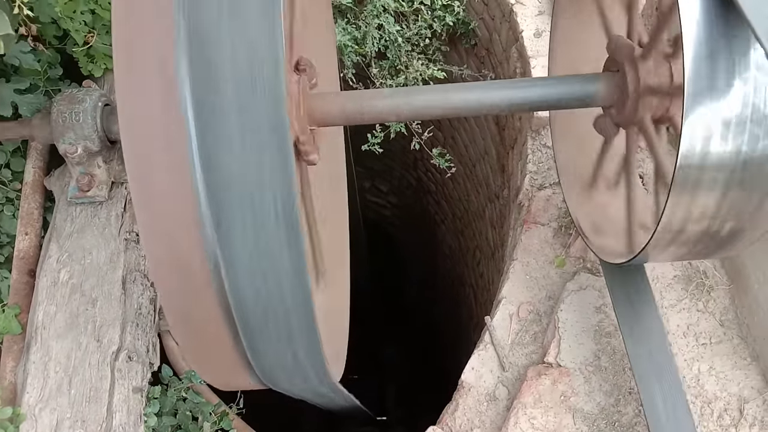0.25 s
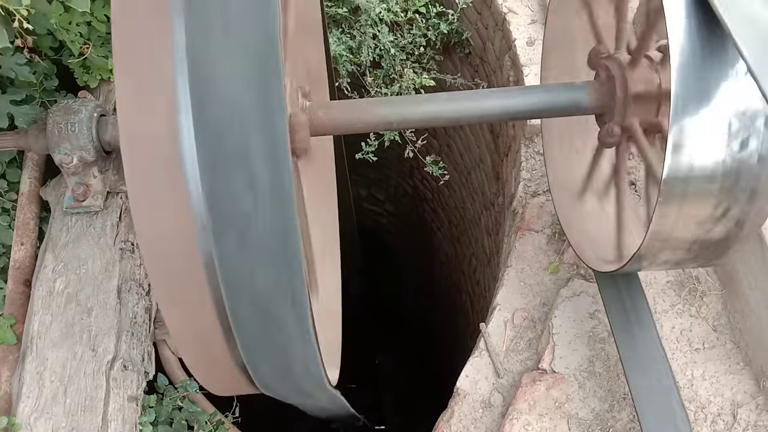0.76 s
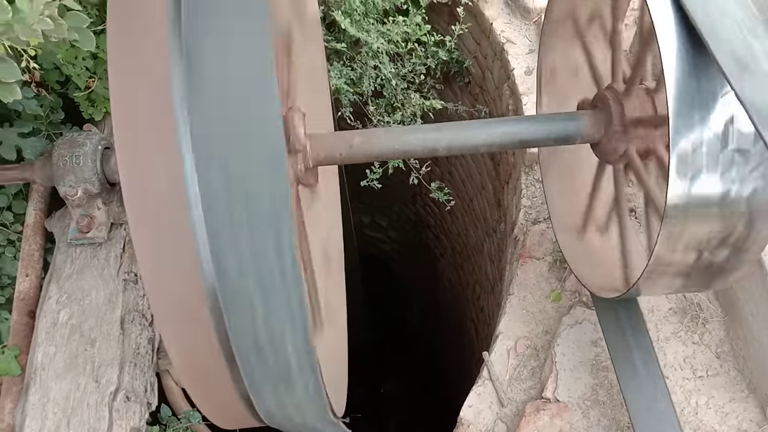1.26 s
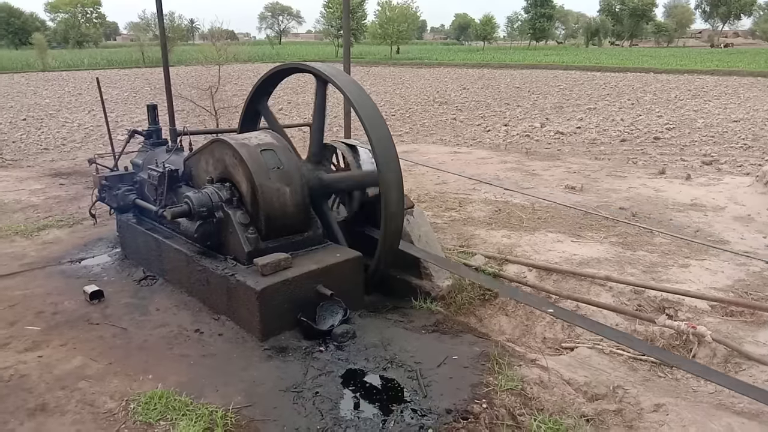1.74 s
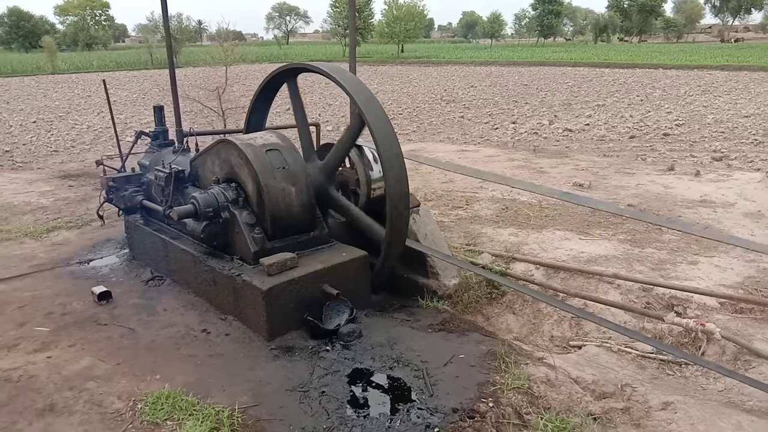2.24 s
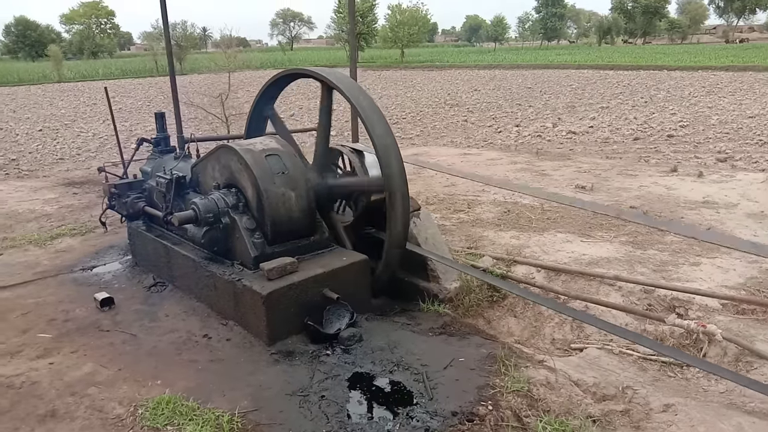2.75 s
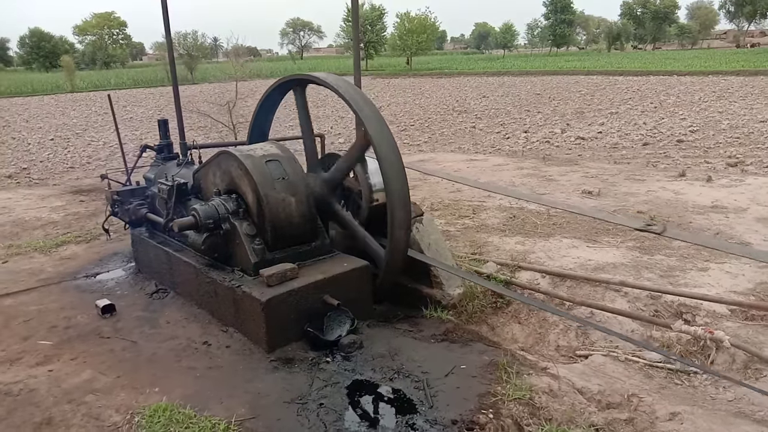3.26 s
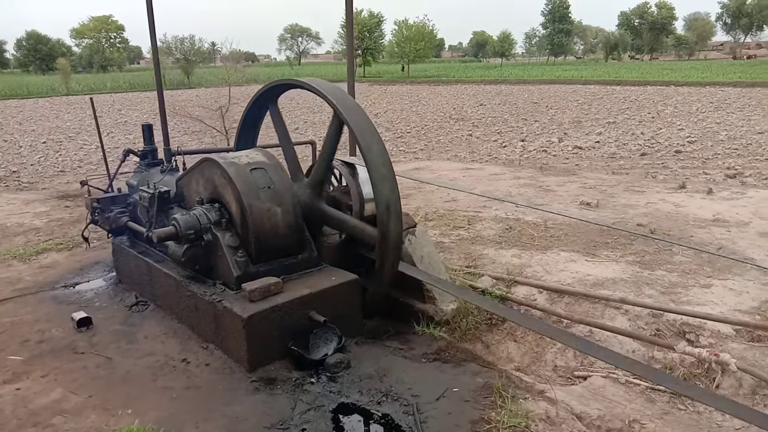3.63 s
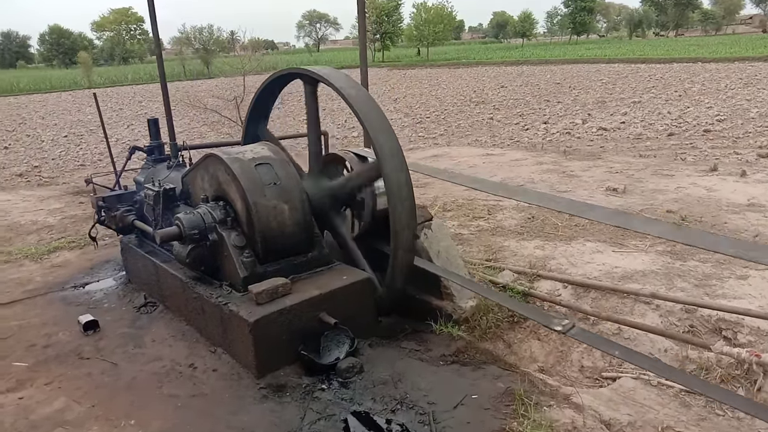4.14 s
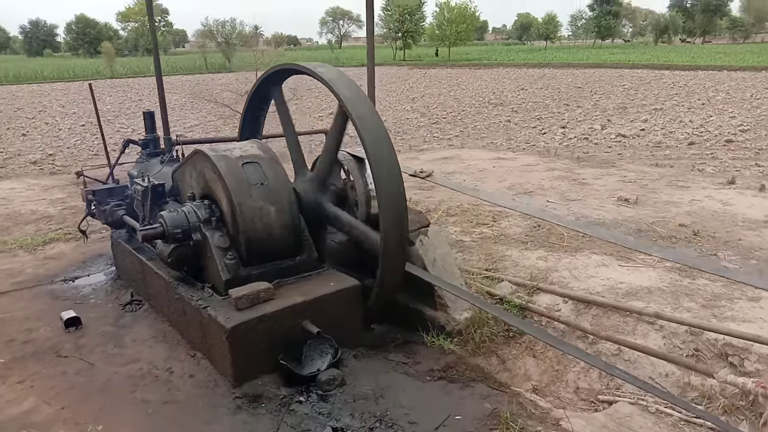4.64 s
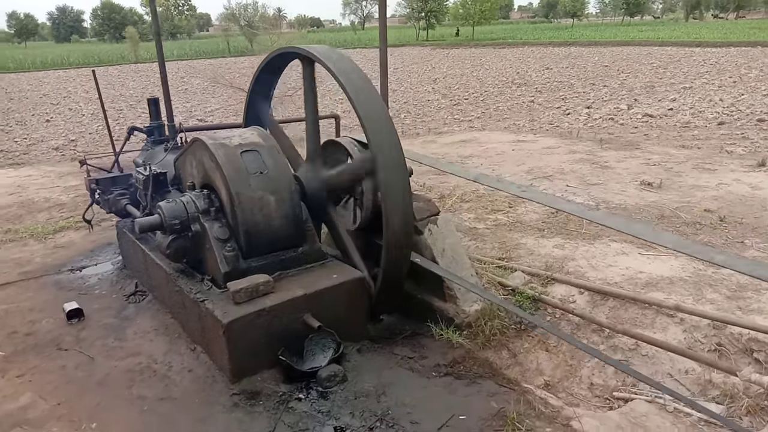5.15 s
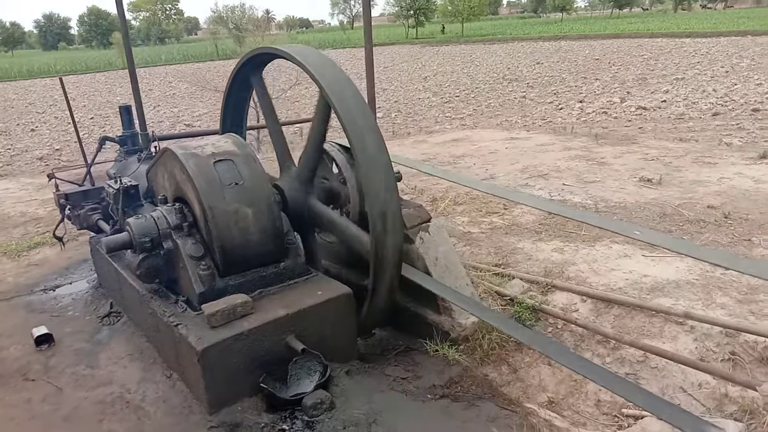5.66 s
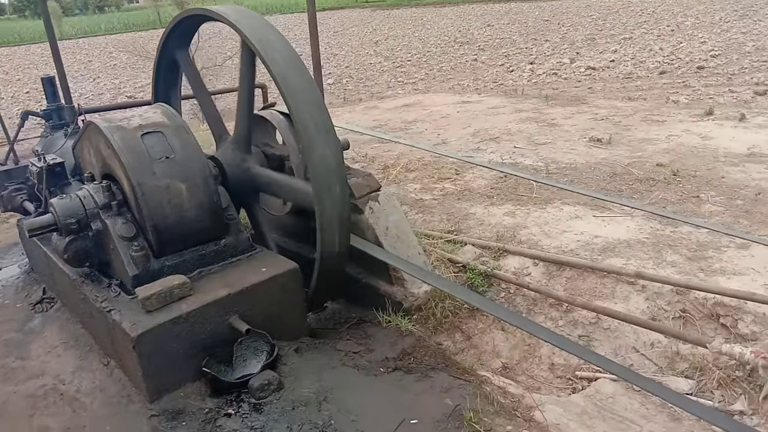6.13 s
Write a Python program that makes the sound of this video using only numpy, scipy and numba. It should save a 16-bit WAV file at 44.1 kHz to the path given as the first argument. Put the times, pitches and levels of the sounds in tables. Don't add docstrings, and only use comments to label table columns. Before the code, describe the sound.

Loose iron knocks and belt slaps at a well pump, a brief silence, then an old single-cylinder diesel clattering and chuffing steadily outdoors.

```python
import sys
import numpy as np
from scipy import signal
from scipy.fft import rfft, irfft
from scipy.io import wavfile
from numba import njit

SR = 44100
rng = np.random.default_rng(int(sys.argv[2]) if len(sys.argv) > 2 else 0)


def wav_record(signal):
    frames = np.transpose(np.atleast_2d(signal))
    bounded = np.clip(frames, -1, 1)
    quanta = np.round(bounded * 32767).astype(np.int16)
    wavfile.write(sys.argv[1], SR, quanta)


def undo_db(level):
    steps = np.asarray(level, float) / 20
    return 10 ** steps


N = 281799
TIME = np.arange(N) / SR
PUMP_ENDS_S, ENGINE_STARTS_S = 1.270, 1.399
CYCLE_S, PUMP_CYCLE_STARTS_S = 0.5785, 0.172

# [t/s, peak level/dB, half length/s]
GUSTS = [(.3, -39.5, .1), (.5, -34, 0.12), (0.762, -24.5, .02), (0.984, -30.5, 0.066),
         (1.438, -39.5, 0.038), (2.07, -39, .05), (2.574, -39, 0.031), (2.717, -41, .03), (3.198, -39, .08),
         (3.465, -31, 0.036), (3.72, -36.5, 0.038), (4.269, -36, 0.076), (4.502, -32.5, 0.036),
         (4.874, -38.5, .05), (5.4, -40, 0.092), (5.547, -32.5, 0.054), (5.7, -34, .06), (5.96, -31, 0.034),
         (6.101, -32, 0.029)]
# [f/Hz, level/dB per Hz]
THUD = [(15, -58.5), (25, -18), (38, -37), (75, -4), (140, -4.5), (180, -23), (310, -120)]
# [f/Hz, level/dB per Hz]
RUMBLE = [(160, -34), (280, 3), (505, 2), (569, 7.5), (1010, 2), (1130, 5), (1250, -33), (1500, -32.5),
          (1950, -48), (3300, -120)]
# [f/Hz, width/Hz, level/dB]
FRAME_RINGS = [(578, 8.3, 7.5), (784, 9, 4), (2217, 160, 5), (3240, 80, 0.5), (6725, 233, -17),
               (7000, 780, 5), (15900, 520, 5)]
# [t/s, level/dB]
TENSION = [
    [(0, -38), (.2, -25), (.7, -30), (.92, -24.5), (1.26, -33.5)],
    [(1.41, -29.5), (1.7, -40.5), (1.93, -27.5), (2.25, -41.5), (2.47, -29), (2.85, -41), (3.08, -29),
     (3.4, -40), (3.68, -27.5), (3.87, -36), (4.25, -27.5), (4.6, -32), (6.39, -28.5)],
]
# [start t/s, firing level/dB, cam rub level/dB, fuel pump squeak level/dB]
CYCLES = [(1.172, -1.5, -14, -41), (1.751, 0.5, -10, -46), (2.329, -0.5, -11.5, -58), (2.9047, 0, -14, -52),
          (3.4823, -1, -10, -56), (4.0604, 0, -17.5, -58), (4.6378, -2, -8.5, -39), (5.2148, -1, -7.5, -47),
          (5.793, 0, -18, -48), (6.373, -2, -18, -77)]
# [t into the cycle/s, f/Hz, flow level/dB]
BREATH = [
    (0, 216, -9.5),
    (.035, 221, 4.5),
    (0.072, 199, -30),
    (0.105, 147.7, -0.5),
    (.2, 186, 3),
    (0.295, 217, 0.5),
    (.4, 219, -21.5),
    (0.448, 206.2, -1),
    (.58, 220.7, -15),
]
# [t/s, peak level/dB, second mode level/dB, third mode level/dB]
PAWL_PINGS = [(1.446, -20.5, -17, -18), (2.0233, -16.5, -23, -20), (2.601, -14.5, -13, -23),
              (3.179, -18, -18, -27), (3.7605, -19.5, -26, -33), (4.3332, -22, -12, -31),
              (4.9108, -17.5, -9, -25), (5.4925, -22.5, -12, -14), (6.068, -19.5, -27, -32)]
# [f/Hz, time to fall 60 dB/s]
PAWL_MODES = [
    (5360, 0.054),
    (10700, 0.028),
    (12800, .06),
]
# [centre t/s, peak level/dB, f/Hz, swell/s]
SQUEAKS = [
    (0.928, -31.5, 4060, 0.088),
    (1.119, -25.5, 3250, .03),
    (4.7734, -1.5, 5200, 0.0008),
    (4.854, -15, 1250, 0.0044),
]
# [f/Hz, level/dB, time to fall 60 dB/s]
ENGINE_PULLEY = [(1740, -2, 0.17), (1946, 10, 0.036), (2093, 9, 0.037), (2695, -2.5, 0.12)]
# [f/Hz, level/dB, time to fall 60 dB/s]
IDLER = [(3500, -4.5, 0.16), (4030, 5.5, 0.013), (4850, -2, 0.012), (5170, -23, 0.043), (6060, -26, 0.22),
         (7050, -29, 0.34), (7260, -6, 0.04)]
# [f/Hz, level/dB per Hz]
IRON_AT_PUMP = [(820, -7.5), (1400, -8), (2010, -9.5), (2170, -6), (2370, -5), (3480, 0.5), (4480, -9),
                (6010, 2.5), (6630, -3.5), (7530, -5.5), (10700, -22.5), (13100, -27), (14500, -17)]
# [f/Hz, level/dB per Hz]
IRON_AT_ENGINE = [(820, -21), (1400, -0.5), (1610, -4.5), (2090, -5.5), (2600, -2), (4400, -3.5),
                  (5350, -1), (6630, -1), (7240, -4), (9710, -20), (12000, -24), (13500, -31), (14500, -18)]
# [t/s, peak level/dB, brightest f/Hz, swell/s, top hiss level/dB]
PUMP_RUBS = [
    (0.2214, -7.5, 7200, 0.036, -25),
    (0.334, -17, 6200, 0.018, -24),
    (0.4594, -8, 6130, 0.0082, -19),
    (0.7296, -16, 5820, 0.014, -29),
    (1.07, -8.5, 3195, 0.022, -26.5),
    (1.099, -9.5, 3240, 0.018, -31),
]
# [t into the cycle/s, peak level/dB, brightest f/Hz, swell/s, top hiss level/dB]
BLOW_BY = [
    (.024, -5, 5100, 0.0047, -11),
    (.044, -4, 7130, .016, -16.5),
    (.05, -36.5, 3240, 0.011, -7),
    (.112, -12.5, 2300, .025, -21.5),
    (.443, -20, 5730, 0.028, -15),
]
# [t/s, peak level/dB, brightest f/Hz, time to fall
# 60 dB/s]
LOOSE_KNOCKS = [(0.0024, -4.5, 3160, 0.051), (0.2988, -12, 5900, 0.08), (0.3136, -8.5, 6360, 0.091),
                (0.3675, -13, 3180, 0.13), (0.4449, -12, 3200, 0.16), (0.5192, -12.5, 3500, 0.16),
                (0.5621, -16, 3350, 0.073), (0.6494, -10.5, 6070, 0.07), (0.9361, -12, 3600, 0.17),
                (1.159, -13, 3000, 0.16), (1.2296, -10.5, 6100, 0.037), (1.2515, -9.5, 5960, 0.071),
                (1.4184, -10.5, 6450, 0.11), (5.563, -17.5, 5420, 0.12), (5.659, -21, 5710, 0.28)]
# [t into the cycle/s, peak level/dB, brightest f/Hz, time to fall 60 dB/s]
VALVE_KNOCKS = [
    (0, -6, 3470, 0.035),
    (.013, -20.5, 2600, 0.033),
    (.082, -17, 4455, 0.13),
    (.137, -27, 7400, 0.094),
    (.302, -18, 5400, 0.021),
    (.32, -38, 7000, .08),
    (.424, -21.5, 5700, .12),
    (.528, -22.5, 3900, 0.056),
]
# [t/s, peak level/dB, brightest f/Hz, volume dip/dB (negative: lift), engine pulley
# level/dB]
BELT_SLAPS = [(0.193, -8, 3900, 12, -22.5), (0.7815, -6, 6160, 11, -43), (0.7966, -4.5, 3760, -9, -45),
              (1.9771, -8, 5870, 3, -19.5), (2.798, -5.5, 8000, 13, -36), (3.3798, -7, 1900, 13, -21.5),
              (3.5964, -7.5, 5560, -2.5, -30), (4.407, -7.5, 7950, 16, -43), (4.7745, -11, 5230, 2, -23),
              (5.208, -5, 5370, 12, -37), (6.0222, -7.5, 7920, 11, -39), (6.1692, -7.5, 4950, 9, -24)]

RATTLE_DB, RATTLE_FLOOR_DB, RATTLE_SAG_DB_PER_S, RATTLE_DULLS = -24, -38.5, 44, 0.28
RATTLE_AT_PUMP_DB, BRIGHT_AT_PUMP_DB, BRIGHT_AT_ENGINE_DB = -29, -4.5, 2
BREATH_DB, BREATH_AT_PUMP_DB = -32, 2
RUMBLE_DB, RUMBLE_AT_PUMP_DB, RUMBLE_FOLLOWS = -32, 5, 0.29
CALM_DB, THUD_FOLLOWS, WHINE_FOLLOWS = -46, 0.22, 0.091
THUMP_DB, PUFF_DB, BEATS_AT_PUMP_DB = -29, -23.5, -15.5
PUMP_HEARS_UNTIL_S, PUMP_LOSES_DB = 0.18, -8
PIPE_TONE_SHARE, PIPE_OWN_SHARE = 0.9, 1.1
RUB_INTO_S, RUB_HZ, RUB_S, RUB_HISS_DB = 0.2296, 5700, 0.014, -39
UNEVEN_DB, UNEVEN_PITCH = 1.0, 0.03
SLAP_T60_S, SLAP_HUSH_DB, SLAP_HUSH_S = 0.048, 6.5, 0.033
KNOCK_RISE_S, FIRING_HUSH_DB = 0.0015, 3


def in_time(tables):
    s, *columns = np.transpose(np.concatenate(tables))
    return [np.interp(TIME, s, column) for column in columns]


def rms_one(x):
    return x / np.sqrt(np.mean(x ** 2) + 1e-20)


def drift(rate):
    r = np.exp(-80 * np.pi * rate / SR)
    slow = signal.lfilter([1], [1, -2 * r, r * r], rng.standard_normal(N // 40 + 2002))[2000:]
    return np.interp(np.arange(N) / 40, np.arange(len(slow)), rms_one(slow))


def crank():
    starts = np.array(CYCLES)[:, 0]
    latest = np.maximum(np.searchsorted(starts, TIME) - 1, 0)
    at_pump = (TIME - PUMP_CYCLE_STARTS_S) % CYCLE_S
    return np.where(TIME < PUMP_ENDS_S, at_pump, TIME - starts[latest])


def every_cycle(contacts):
    chance = rng.standard_normal((len(CYCLES), len(contacts), 2))
    events = []
    for (start, strength_db, *_), row in zip(CYCLES, chance):
        for (into, db, hz, *rest), (a, b) in zip(contacts, row):
            if ENGINE_STARTS_S < start + into < N / SR:
                level_db = db + strength_db + UNEVEN_DB * a
                events.append((start + into, level_db, hz * (1 + UNEVEN_PITCH * b), *rest))
    return events


def coloured(spectrum, grain_db):
    grains = rng.standard_normal(N) * undo_db(grain_db * np.minimum(rng.exponential(1, N), 5))
    hz = np.maximum(np.arange(N // 2 + 1) * SR / N, 1)
    points = np.array(spectrum)
    level_db = np.interp(np.log(hz), np.log(points[:, 0]), points[:, 1], left=-90)
    for centre_hz, width, db in FRAME_RINGS:
        level_db = level_db + db / (1 + (2 * (hz - centre_hz) / width) ** 2)
    modes_db = np.interp(hz, np.arange(200) * 110, rng.normal(0, 1.8, 200)) * (hz > 1600)
    bins = rfft(grains) * undo_db(level_db + modes_db)
    return hz, bins / np.sqrt(2 * np.sum(np.abs(bins) ** 2)) * N


def ring(clicks, hz, t60):
    r, w = undo_db(-60 / (t60 * SR)), 2 * np.pi * hz / SR
    return signal.lfilter([0, np.sin(w)], [1, -2 * r * np.cos(w), r * r], clicks + 1e-18)


@njit
def moving_resonance(x, hz, width, rate):
    out, r = np.zeros(len(x)), np.exp(-np.pi * width / rate)
    for i in range(2, len(x)):
        turn = 2 * r * np.cos(2 * np.pi * hz[i] / rate)
        out[i] = x[i] - x[i - 2] + turn * out[i - 1] - r * r * out[i - 2]
    return out


def struck(times, peaks_db, hz, t60, contact_s):
    clicks = np.zeros(N)
    clicks[np.round(times * SR).astype(int)] = undo_db(peaks_db)
    r = np.exp(-1 / (contact_s * SR))
    scrape = signal.lfilter([np.sqrt(1 - r * r)], [1, -r], clicks) * rng.standard_normal(N)
    return ring(scrape, hz, t60)


def swell(s, peak_db, hz, length):
    late = TIME - s
    return undo_db(peak_db) * np.exp(-(late / length) ** 2) * np.cos(2 * np.pi * hz * late)


def gain_dip():
    dip_db = np.zeros(N)
    for s, db, hz, depth_db, ring_db in BELT_SLAPS:
        late = TIME - s
        dip_db -= depth_db * np.clip(1 + late / 0.016, 0, 1) * np.exp(-np.maximum(late, 0) / 0.0058)
    return undo_db(dip_db)


def thuds(flow_db):
    gusts = sum(undo_db(db) ** 2 * np.exp(-((TIME - s) / length) ** 2) for s, db, length in GUSTS)
    thud_db = 10 * np.log10(undo_db(CALM_DB + THUD_FOLLOWS * flow_db) ** 2 + gusts)
    thud = irfft(coloured(THUD, grain_db=-1.5)[1], N) * undo_db(1.5 * drift(11))
    return undo_db(thud_db) * rms_one(thud)


def frame_rumble(flow_db):
    rumble_db = RUMBLE_DB + RUMBLE_AT_PUMP_DB * (TIME < PUMP_ENDS_S) + RUMBLE_FOLLOWS * flow_db
    rumble = irfft(coloured(RUMBLE, grain_db=2.5)[1], N) * undo_db(2.1 * drift(22))
    return undo_db(rumble_db) * rms_one(rumble)


def shaft_whine(flow_db):
    firing_hush_db = FIRING_HUSH_DB * np.exp(-((crank() - 0.06) / 0.036) ** 2)
    whine_db = in_time(TENSION)[0] + WHINE_FOLLOWS * flow_db - firing_hush_db
    white = rng.standard_normal((2, N))
    line = rms_one(moving_resonance(white[0], 1238 + 12 * drift(3), 14.0, SR))
    centre_hz = np.full(N, 1270.0)
    skirt = moving_resonance(white[1], centre_hz, 130.0, SR)
    skirt = rms_one(moving_resonance(skirt, centre_hz, 230.0, SR))
    return undo_db(whine_db) * rms_one(line + 0.85 * skirt) * undo_db(1.6 * drift(35))


def pipe(breath_db):
    late = crank()
    crank_s, hz, flow_db = np.transpose(BREATH)
    hz, flow_db = np.interp(late, crank_s, hz), np.interp(late, crank_s, flow_db)
    once = moving_resonance(rng.standard_normal(N), hz, 46.0, SR)
    breath = 1.5 * rms_one(once) + 0.5 * rms_one(moving_resonance(once, hz, 110.0, SR))
    overtone = moving_resonance(rng.standard_normal(N), 3 * hz, 60.0, SR)
    tone = np.sin(2 * np.pi * np.cumsum(hz * (1 + 0.03 * drift(20))) / SR)
    own = rms_one(ring(rng.standard_normal(N), 221.44, 0.3))
    nearer = np.clip((TIME - ENGINE_STARTS_S) / 4, 0, 1)
    breath = rms_one(rms_one(breath) + PIPE_TONE_SHARE * tone + PIPE_OWN_SHARE * own * nearer)
    breath = breath + undo_db(-9.5) * rms_one(overtone)
    thump_late, puff_late = late - 0.0229, late - 0.446
    thump = undo_db(THUMP_DB) * np.exp(-(thump_late / 0.0073) ** 2) * np.cos(2 * np.pi * 91 * thump_late)
    puff = undo_db(PUFF_DB) * np.exp(-(puff_late / 0.011) ** 2) * np.cos(2 * np.pi * 224 * puff_late)
    beats = undo_db(BEATS_AT_PUMP_DB * (TIME < PUMP_ENDS_S)) * (thump + puff)
    return undo_db(breath_db + flow_db) * breath, beats, flow_db


def body(dip):
    lost_db = PUMP_LOSES_DB * np.clip((crank() - PUMP_HEARS_UNTIL_S) / 0.051, 0, 1)
    breath_db = BREATH_DB + (TIME < PUMP_ENDS_S) * (BREATH_AT_PUMP_DB + lost_db)
    breath, beats, flow_db = pipe(breath_db)
    late = TIME - np.array(BELT_SLAPS)[:, :1]
    hush = undo_db(-SLAP_HUSH_DB * np.sum(np.exp(-(late / SLAP_HUSH_S - 0.6) ** 2), axis=0))
    low = breath + thuds(flow_db) + frame_rumble(flow_db)
    return dip * hush * low + hush * beats + dip ** 0.72 * shaft_whine(flow_db)


def fuel_pump():
    stroke, spurt = np.zeros(N), np.zeros(N)
    for s, strength_db, rub_db, squeak_db in CYCLES:
        stroke += undo_db(squeak_db) * np.exp(-((TIME - s - 0.47) / 0.044) ** 2)
        spurt += np.exp(-np.maximum(TIME - s - 0.425, 0) / 0.032) * (TIME > s + 0.425)
    broken = undo_db(10.0 * np.minimum(drift(25), 1) - 5)
    squeak = broken * rms_one(ring(rng.standard_normal(N), 12800, 0.041))
    hiss = irfft(coloured(IRON_AT_ENGINE, grain_db=-9.0)[1], N)
    hiss = signal.sosfilt(signal.butter(4, 8500.0, "high", fs=SR, output="sos"), hiss)
    return stroke * squeak + undo_db(-31.5) * spurt * rms_one(hiss)


def pings():
    s, db, second_db, third_db = np.transpose(PAWL_PINGS)
    out = struck(s, db + 0.5, 5540, 0.027, 0.018)
    for (hz, t60), extra_db in zip(PAWL_MODES, (0, second_db, third_db)):
        out += struck(s, db + extra_db + 1.0, hz, t60, 0.0067)
    return out + sum(swell(*squeak) for squeak in SQUEAKS)


def pulleys():
    s, db, _, _, ring_db = np.transpose(BELT_SLAPS)
    out = np.zeros(N)
    for hz, mode_db, t60 in IDLER:
        own_db = rng.normal(0, 5.0, len(s))
        out += struck(s, db + mode_db - 16 + own_db, hz, min(t60, 0.1), 0.0091)
    for hz, mode_db, t60 in ENGINE_PULLEY:
        out += struck(s, db + ring_db + mode_db + 5, hz, min(t60, 0.2), 0.063)
    return out


def iron_bands(centres, grain_db):
    out = np.zeros((len(centres), N))
    for spectrum, here in ((IRON_AT_PUMP, TIME < PUMP_ENDS_S), (IRON_AT_ENGINE, TIME >= PUMP_ENDS_S)):
        hz, bins = coloured(spectrum, grain_db)
        place = np.interp(np.log(hz), np.log(centres), np.arange(len(centres)))
        for k in range(len(centres)):
            out[k] += here * irfft(bins * np.maximum(1 - np.abs(place - k), 0), N)
    return out


def rattle_power(centres, dip):
    at_pump = TIME < PUMP_ENDS_S
    sagging = undo_db(RATTLE_DB - RATTLE_SAG_DB_PER_S * crank()) * np.minimum(crank() / 0.039, 1)
    engine_db = 10 * np.log10(sagging ** 2 + undo_db(RATTLE_FLOOR_DB) ** 2)
    rattle_db = np.where(at_pump, RATTLE_AT_PUMP_DB, engine_db)
    engine_bright_db = BRIGHT_AT_ENGINE_DB + RATTLE_DULLS * (engine_db - RATTLE_DB)
    bright_db = np.where(at_pump, BRIGHT_AT_PUMP_DB, engine_bright_db)
    together = drift(27)
    slack_db = 0.66 * np.minimum(rattle_db + 30.5, 0)
    power = np.zeros((len(centres), N))
    for k, hz in enumerate(centres):
        tilt_db = bright_db * np.clip(np.log2(hz / 6000), -1, 1)
        castings_db = slack_db * np.exp(-(np.log2(hz / 3700) / 0.53) ** 2)
        wander_db = 0.5 * together + 3.12 * drift(25)
        power[k] = (dip * undo_db(rattle_db + tilt_db + castings_db + wander_db)) ** 2
    return power


def add(power, centres, s, peak_db, hz, shape, lead, bump_db, top_db, low_db=0):
    start = round((s - lead) * SR)
    shape = shape[:, :N - start]
    edges_db = top_db * np.clip(np.log2(centres / 7500), 0, 1) ** 0.5 + low_db * (centres < 2400)
    colour = undo_db(peak_db + bump_db * np.exp(-(np.log2(centres / hz) / 0.25) ** 2) + edges_db)
    power[:, start:start + shape.shape[1]] += (colour[:, None] * shape) ** 2


def ironwork(dip):
    centres = np.geomspace(1500, 15500, 12)
    after = np.arange(round(0.3 * SR)) / SR
    power = rattle_power(centres, dip)
    lasting = (centres[:, None] / 5000) ** -0.3
    for s, db, hz, t60 in LOOSE_KNOCKS + every_cycle(VALVE_KNOCKS):
        shape = (1 - np.exp(-after / KNOCK_RISE_S)) * undo_db(-60 * after / (t60 * lasting))
        add(power, centres, s, db - 7.5, hz, shape, 0.001, bump_db=5.5, top_db=1.5)
    for s, db, hz, dip_db, ring_db in BELT_SLAPS:
        tail = undo_db(-1.5 - 60 * after / (0.16 * lasting))
        fall = undo_db(-60 * after / (SLAP_T60_S * lasting)) + tail
        shape = (1 - np.exp(-after / 0.00056)) * fall
        add(power, centres, s, db - 12.0, hz, shape, 0.001, bump_db=6.0, top_db=7.0, low_db=ring_db + 21.5)
    cam_rubs = [(s + RUB_INTO_S, rub_db, RUB_HZ, RUB_S, RUB_HISS_DB) for s, _, rub_db, _ in CYCLES[:-1]]
    for s, db, hz, length, hiss_db in PUMP_RUBS + every_cycle(BLOW_BY) + cam_rubs:
        stretch = np.where(after > 0.05, 0.83 * lasting, 1)
        shape = np.exp(-((after - 0.05) / (max(length, 0.003) * stretch)) ** 2)
        lead = 0.05 - 0.49 * length
        add(power, centres, s, db - 16.5, hz, shape, lead, bump_db=9.5, top_db=hiss_db + 31.0)
    return np.sum(np.sqrt(power) * iron_bands(centres, grain_db=3.0), axis=0)


def scene():
    dip = gain_dip()
    return (body(dip) + fuel_pump() + pings() + pulleys() + ironwork(dip))[None]


def top_cut(x):
    return signal.sosfilt(signal.butter(12, 16830, fs=SR, output="sos"), x)


def record(dry):
    cut = signal.sosfilt(signal.ellip(8, 1, 44, 15550, fs=SR, output="sos"), dry)
    cut = signal.sosfilt(signal.butter(2, 42.0, "high", fs=SR, output="sos"), cut)
    heard = np.clip(np.maximum(PUMP_ENDS_S - TIME, TIME - ENGINE_STARTS_S) / 0.0012, 0, 1)
    return top_cut(heard * cut)


dry = scene()
out = record(dry)
wav_record(out)
```